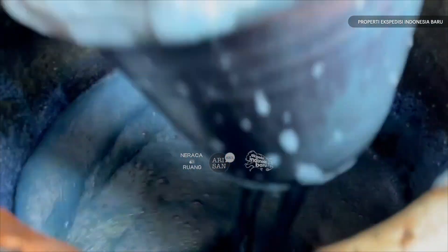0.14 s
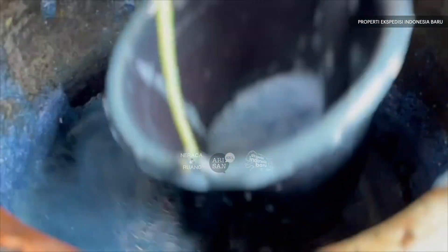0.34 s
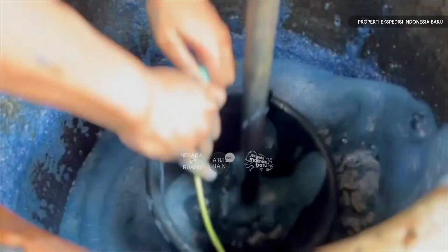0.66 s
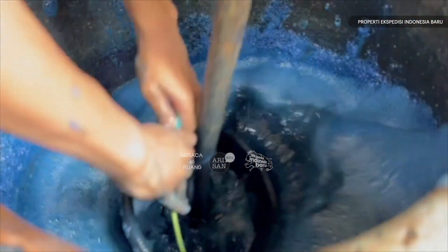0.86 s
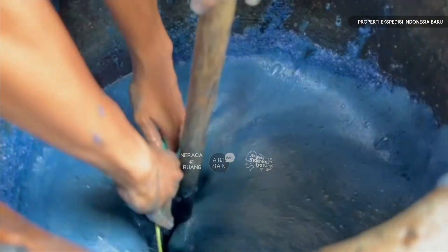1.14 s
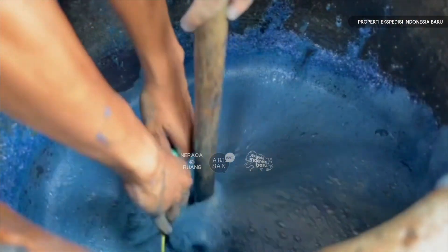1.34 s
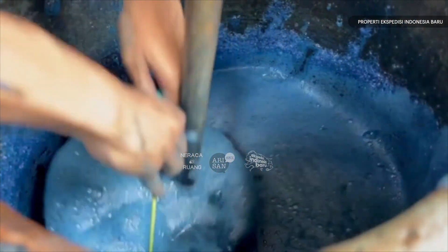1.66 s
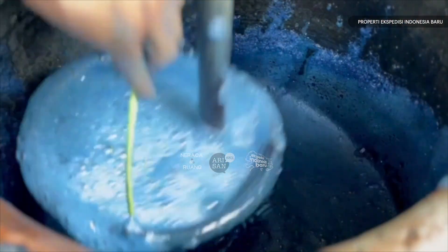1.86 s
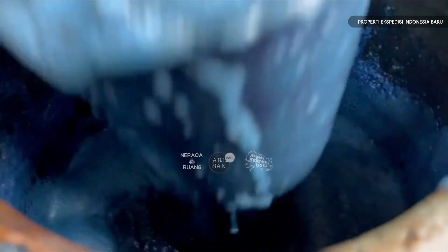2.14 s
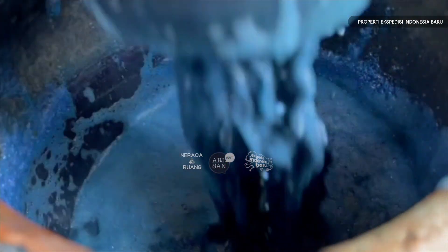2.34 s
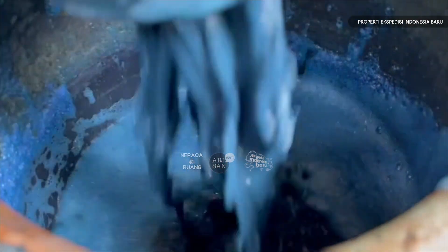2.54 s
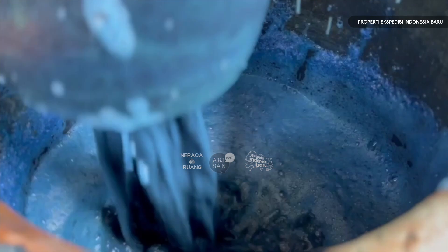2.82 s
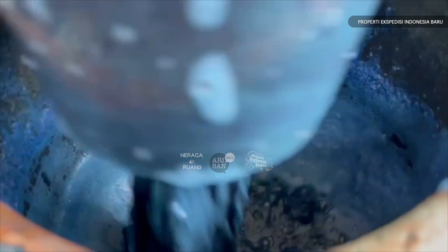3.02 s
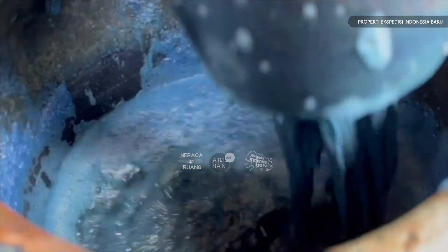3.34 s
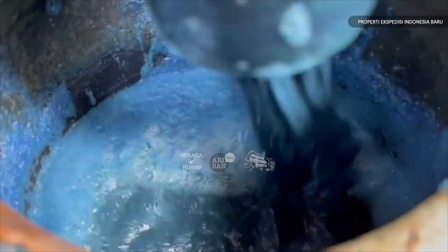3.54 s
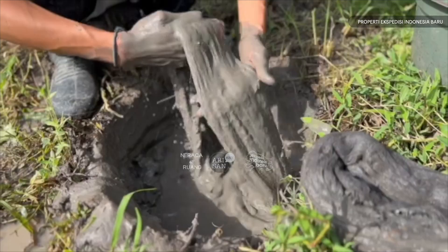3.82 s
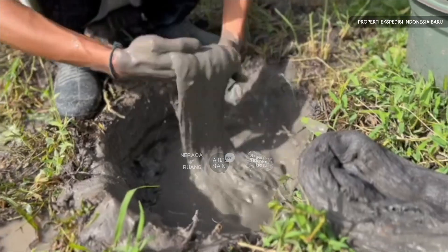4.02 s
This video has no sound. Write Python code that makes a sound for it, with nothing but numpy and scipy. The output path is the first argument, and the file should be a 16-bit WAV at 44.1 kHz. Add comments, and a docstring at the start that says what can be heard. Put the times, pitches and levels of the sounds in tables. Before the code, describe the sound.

Close inside a vat, dye drains and gurgles from a bucket, sinks with heavy booming sloshes, then pours noisily again until a sudden cut.

```python
"""Inside a deep vat of thick dye, the microphone just within the rim, a bucket full of holes goes up and down.
Dye streams from it as surging slosh (noise through low air modes), gurgle and froth (noise and bubbles
through cross modes) and spray (patchy noise and tiny bubbles). Knocks and booms are decaying tones,
splashes are noise puffs, and single bubbles are short rising tones. The round wall answers with a short
tail over steady outdoor air. The sound is cut off shortly before the end."""
import sys
import numpy as np
from scipy import signal
from scipy.fft import rfft, irfft, next_fast_len
from scipy.io import wavfile
from scipy.ndimage import uniform_filter1d, map_coordinates

SR = 44100
rng = np.random.default_rng(int(sys.argv[2]) if len(sys.argv) > 2 else 0)


def persist_wave(psi):
    """Save psi, clipped to +-1, as 16-bit WAV."""
    counts = np.round(np.clip(psi, -1, 1) * 32767).astype(np.int16)
    wavfile.write(sys.argv[1], SR, np.atleast_2d(counts).T)


N = 183985

# Dye streaming from the bucket and moving in the vat between blows.
# Each row: time in seconds, then slosh, gurgle, froth and spray level, all in dB.
FLOW = [(0, -21, -24, -30.5, -34.5), (.07, -24, -34.5, -35, -36), (.13, -30, -39, -32.5, -40.5),
        (.2, -31.5, -41, -46.5, -46), (.3, -33.5, -56, -54, -48.5), (.39, -36, -47.5, -50, -50.5),
        (.47, -22, -33, -39.5, -39.5), (.56, -39, -53.5, -52.5, -50.5), (.63, -30, -50, -64, -52.5),
        (.76, -27, -48.5, -54, -46), (1.0, -44.5, -52, -49, -47.5), (1.1, -22, -41, -47, -46),
        (1.2, -18.5, -37, -38, -46.5), (1.29, -16.5, -40, -48, -56), (1.48, -39, -58, -63.5, -58),
        (1.68, -46, -57, -58.5, -52.5), (1.84, -34.5, -49, -55, -53), (1.86, -40.5, -51, -38, -48),
        (1.96, -33.5, -36, -47.5, -47.5), (2.11, -31, -46, -38.5, -37), (2.26, -29, -37.5, -38, -32),
        (2.51, -28.5, -38, -37.5, -34), (2.63, -23.5, -35, -35, -30), (2.77, -20, -27, -29.5, -26.5),
        (2.9, -19.5, -32, -28.5, -28), (3.0, -22, -37.5, -29.5, -30.5), (3.33, -25, -31, -32, -33),
        (3.53, -31, -35, -35, -32), (3.68, -22, -27.5, -28, -32.5), (3.81, -26.5, -34.5, -35.5, -31.5)]
# Lowest air modes of the vat, the sharp one first. Each row: centre in Hz, width in Hz, relative level in dB.
BOOM_MODES = [(120.8, 6.83, 5.5), (97.2, 55.7, -4.5), (186, 104.5, -10.5), (72, 53, -11.5)]
# The broad low modes against the sharp one. Each row: time in seconds, level change in dB.
BROAD_MODE_LEVEL = [(0, -1), (0.6, -1), (0.9, -3.5), (1.6, -4), (2.0, 0), (2.8, 0), (3.8, 1)]
# Cross modes of the vat. Each row: centre in Hz, width in Hz, relative level in dB.
CROSS_MODES = [(369, 86, -2), (517, 70, 1.5), (676, 78, -1.5), (1002, 264, -2.5), (1181, 360, -0.5),
               (1367, 305, -2.5), (1688, 300, -13), (1950, 140, -8.5), (2160, 81, -11)]
# Colour of spray, in the stream and in the splashes. Each row: frequency in Hz, relative level in dB.
SPRAY_COLOUR = [(700, 0.5), (1650, 2), (2130, 4), (2600, 2), (2950, 0), (3500, -3.5), (5200, -5),
                (5700, -5.5), (7500, -6), (10300, -10.5), (12200, -4.5), (15500, -13)]
FIZZ_DB = -7.5  # fizz over spray
STIR_RISE_S, STIR_T60_S = 0.003, 0.079  # a blow stirs the dye up for a moment
# Stirring in dB: slosh over a thump's boom, gurgle over its bucket ring, froth over a splash.
STIR_SLOSH_DB, STIR_GURGLE_DB, STIR_FROTH_DB = -11.5, -14.5, -20


def stream():
    """Moving dye: surges drive the boom, bubbles sound through the vat's modes, spray fizzes."""
    slosh_db, gurgle_db, froth_db, spray_db = curves(FLOW)
    surge = wobble(14)

    lumps = amp(2.7 * wobble(30.1) + 1.1 * surge) * rng.standard_normal((2, N))
    sharp_boom = filtered(lumps, modes(BOOM_MODES[:1]))
    broad_level = amp(curves(BROAD_MODE_LEVEL)[0])
    broad_boom = filtered(broad_level * lumps, modes(BOOM_MODES[1:]))
    slosh = unit(sharp_boom - broad_boom)

    churn = patchy(patchy_db=1.2)
    churn = churn + 0.9 * bubbles(count=9000, size=480, centre_hz=1150, spread=0.55, turns=3, uneven_db=2.3)
    churn_gain = amp(0.88 * surge + 0.25 * wobble(43))
    gurgle, froth = split(churn_gain * filtered(churn, modes(CROSS_MODES)), hz=836, steep=10.6)

    drops = patchy(patchy_db=2.5)
    drops = drops + 0.33 * bubbles(count=7000, size=120, centre_hz=6000, spread=0.65, turns=2.5, uneven_db=2.4)
    drops *= amp(0.8 * surge + 1.304 * wobble(45) + 0.21 * wobble(110))
    spray, fizz = split(filtered(drops, spray_colour), hz=11000, steep=18.0)

    slosh_blows = [(s, boom_db + STIR_SLOSH_DB) for s, boom_db, *_ in THUMPS]
    gurgle_blows = [(s, ring_db + STIR_GURGLE_DB) for s, *_, ring_db in THUMPS]
    froth_blows = [(s, db + STIR_FROTH_DB) for s, db, _ in SPLASHES]
    return (slosh * stirred(slosh_db, slosh_blows)
            + gurgle * stirred(gurgle_db, gurgle_blows)
            + froth * stirred(froth_db, froth_blows)
            + amp(spray_db) * (spray + amp(FIZZ_DB) * fizz))


# Bucket knocks and gulps. Each row: start in seconds, boom level in dB, boom pitch in Hz,
# knock level in dB, pitch the knock settles to in Hz, bucket ring level in dB.
THUMPS = [(0.066, -20, 116.6, -30.5, 169, -42), (0.133, -19, 107, -19.5, 231, -21),
          (0.237, -33, 116, -28.5, 247, -48), (0.254, -24, 103, -22.5, 279, -35),
          (0.323, -31, 85, -34, 161, -35.5), (0.442, -21, 119.4, -19, 153, -40),
          (0.655, -11.5, 119.3, -22, 161, -25.5), (0.708, -20, 119.4, -32, 164, -36),
          (1.02, -26, 121.7, -18, 183, -29), (1.102, -19.5, 112, -23, 168, -33),
          (1.143, -22, 131, -31, 160.5, -40), (1.198, -18, 139.7, -20.5, 174, -32),
          (1.241, -8, 127, -28.5, 159.5, -33), (1.313, -24.5, 150, -17, 190, -36),
          (1.339, -30, 116, -16.5, 115, -45), (1.36, -10, 109.2, -16, 185.7, -22.5),
          (1.434, -23.5, 126, -34, 164.3, -33.5), (1.565, -30, 86.4, -59, 242, -46),
          (1.629, -30.5, 131.5, -33.5, 200, -32), (1.737, -30.5, 152, -8.5, 165, -28.5),
          (1.749, -22, 95, -8, 94, -53), (2.183, -21.5, 110, -38, 191, -52),
          (2.312, -17.5, 116.3, -47, 170, -42), (2.337, -17.5, 111, -44, 167, -58),
          (2.567, -17, 121, -17, 203, -27), (2.667, -20, 92, -29, 161, -28),
          (2.749, -12.5, 97, -33.5, 189, -29), (2.812, -9, 103.4, -26.5, 163.3, -33),
          (2.955, -12, 118, -10, 117.5, -36.5), (3.159, -15.5, 90, -19.5, 153, -25),
          (3.334, -23, 119.5, -36, 184, -29), (3.664, -14, 130, -15, 161, -26)]
# Ringing of the bucket itself. Each row: nominal pitch in Hz, level in dB over the ring, 60 dB decay in seconds.
BUCKET_MODES = [(337, -1, 0.045), (475, -5, 0.017), (640, -16, 0.038), (954, -20.5, 0.013),
                (1358, -14, 0.032), (2103, -18.5, 0.016)]
BOOM_RISE_S, BOOM_T60_S, KNOCK_RISE_S, KNOCK_T60_S, BUCKET_RISE_S = 0.0043, 0.2, 0.003, 0.067, 0.00081
KNOCK_SAG, KNOCK_SAG_S = 0.52, 0.0038  # a knock starts this share sharp and sags to its pitch


def thumps():
    """Each knock rings the bucket briefly; the vat's boom swells just after."""
    out, t = np.zeros((2, N)), np.arange(SR // 3) / SR

    def ring(turns, db, t60, rise):
        """A decaying tone, its second part a quarter cycle late."""
        return amp(db) * swell(t, rise, t60) * np.sin(2 * np.pi * (turns - [[0], [1 / 4]]))

    sagging = t + KNOCK_SAG * KNOCK_SAG_S * (1 - np.exp(-t / KNOCK_SAG_S))
    for s, boom_db, boom_hz, knock_db, knock_hz, ring_db in THUMPS:
        add(out, s, ring(boom_hz * t, boom_db, BOOM_T60_S, BOOM_RISE_S))
        add(out, s, ring(knock_hz * sagging, knock_db, KNOCK_T60_S, KNOCK_RISE_S))
        for hz, db, t60 in BUCKET_MODES:
            struck_hz = hz * (1 + 0.041 * rng.normal())
            struck_db = ring_db + db + rng.normal(0, 1.7)
            add(out, s, ring(struck_hz * t, struck_db, t60, BUCKET_RISE_S))
    return out


# Slaps of dye on the surface and wall. Each row: start in seconds, level in dB before the spray colour,
# brightness in dB (gain of the part above the split).
SPLASHES = [(0.059, -32, 4), (0.112, -36.5, 7), (0.169, -52, -9), (0.342, -35, 0.5), (0.462, -35, -9.5),
            (0.499, -32.5, -15.5), (0.634, -33, -3.5), (0.652, -25.5, 2), (0.704, -27, 3), (0.719, -37, 0),
            (0.797, -35.5, 4.5), (0.87, -38, -6), (0.906, -37.5, -7), (1.007, -36, 8.5), (1.024, -31, 4.5),
            (1.044, -25.5, 6.5), (1.06, -32.5, 4.5), (1.221, -42, 0), (1.367, -42, -7), (1.38, -39, -6),
            (1.7613, -43, 9.5), (1.8144, -43, -5.5), (1.854, -48, -8), (2.1044, -49, -1.5),
            (2.157, -23.5, 3), (2.184, -24.5, -4.5), (2.4325, -25.5, 9), (2.4914, -26.5, 7),
            (2.5505, -24, 0.5), (2.581, -24.5, 10.5), (2.61, -19, 6.5), (2.6457, -19.5, 3.5),
            (2.677, -23, -5.5), (2.726, -32, 5.5), (2.7473, -21, 3), (2.771, -23, 9), (2.8741, -21.5, -8.5),
            (2.9832, -29.5, -8.5), (3.054, -34.5, 19.5), (3.103, -26.5, -9.5), (3.451, -32.5, 19.5),
            (3.5472, -38, -3), (3.6331, -23, 4), (3.748, -34, -4.5)]
SPLASH_RISE_S, SPLASH_T60_S, SPLASH_SPLIT_HZ = .0045, .052, 10500
SPLASH_CRACKLE_DB, CRACKLE_RATE = 2.2, 220  # a splash breaks up into droplets: depth, random knots a second


def splashes():
    """Short noise puffs coloured as spray; brighter ones carry more of the highest treble."""
    low, high, t = np.zeros((2, N)), np.zeros((2, N)), np.arange(SR // 4) / SR
    for s, db, bright_db in SPLASHES:
        puff = amp(db) * swell(t, SPLASH_RISE_S, SPLASH_T60_S) * rng.standard_normal((2, len(t)))
        add(low, s, puff)
        add(high, s, amp(bright_db) * puff)
    low_share = lambda hz: 1 / (1 + (hz / SPLASH_SPLIT_HZ) ** 8)
    crackle = unit(amp(SPLASH_CRACKLE_DB * wobble(CRACKLE_RATE)))
    body = filtered(crackle * low, lambda hz: spray_colour(hz) * low_share(hz))
    treble = filtered(crackle * high, lambda hz: spray_colour(hz) * (1 - low_share(hz)))
    return body + treble


# Single loud bubbles. Each row: start in seconds, peak level in dB, starting pitch in Hz.
PLOPS = [(0.003, -28, 525), (0.005, -32, 795), (0.013, -30.5, 1196), (0.045, -28, 1450), (0.057, -24, 713),
         (0.059, -27, 493), (0.078, -24, 1244), (0.103, -25.5, 1160), (0.12, -28, 1630), (0.211, -35, 490),
         (0.266, -30.5, 315), (0.256, -34.5, 1020), (0.322, -32, 327), (0.019, -42, 1300),
         (0.033, -18, 473), (0.067, -22.5, 1140), (0.133, -27, 930), (0.132, -23, 481), (0.137, -30.5, 335),
         (0.148, -25.5, 334), (0.17, -30, 1980), (0.326, -37, 1330), (0.343, -33, 2140),
         (0.352, -31.5, 1140), (0.439, -32, 514), (0.445, -37, 2750), (0.448, -24.5, 333),
         (0.458, -38, 2750), (0.462, -36, 1090), (0.46, -34.5, 670), (0.469, -28, 480), (0.47, -23.5, 326),
         (0.478, -35.5, 2000), (0.48, -34, 1090), (0.637, -36.5, 920), (0.657, -29.5, 1350),
         (0.663, -35.5, 3570), (0.657, -23.5, 2880), (0.661, -37, 432), (0.687, -29, 415),
         (0.714, -32.5, 766), (0.78, -32.5, 393), (0.8, -46, 2380), (0.873, -32.5, 368), (0.876, -41, 2140),
         (0.908, -38, 2670), (0.909, -33.5, 1360), (1.025, -35, 420), (1.027, -32.5, 1340),
         (1.032, -31, 2080), (1.04, -28.5, 760), (1.043, -30.5, 1950), (1.132, -28, 466),
         (1.146, -24.5, 454), (1.15, -32, 700), (1.164, -29.5, 1180), (1.17, -30.5, 438), (1.191, -21, 467),
         (1.21, -19, 533), (1.209, -26, 850), (1.265, -27, 614), (1.268, -26.5, 508), (1.305, -29.5, 550),
         (1.306, -35, 720), (1.361, -21.5, 346), (1.362, -25.5, 491), (1.379, -33, 1290),
         (1.38, -26.5, 339), (1.439, -30, 329), (1.567, -42, 610), (1.629, -36.5, 645), (1.63, -40.5, 1280),
         (1.732, -28.5, 472), (1.741, -31, 427), (1.736, -39, 750), (1.764, -40, 2640), (1.853, -27.5, 920),
         (1.894, -33, 490), (1.926, -29, 413), (1.947, -32, 2000), (2.045, -27, 505), (2.076, -28, 1940),
         (2.156, -31, 700), (2.158, -30, 1140), (2.187, -34.5, 480), (2.283, -27, 637), (2.283, -24, 1115),
         (2.315, -23.5, 1920), (2.331, -30.5, 2100), (2.368, -25.5, 645), (2.4, -26.5, 650),
         (2.434, -26.5, 420), (2.462, -29, 670), (2.494, -20, 1870), (2.526, -23, 1880), (2.57, -25.5, 416),
         (2.57, -27, 900), (2.612, -27.5, 1220), (2.613, -39, 3000), (2.614, -26, 5200),
         (2.614, -31.5, 1880), (2.666, -19.5, 1037), (2.67, -27, 1540), (2.68, -18, 1060),
         (2.691, -28.5, 2920), (2.728, -25.5, 620), (2.748, -23.5, 830), (2.749, -23.5, 2870),
         (2.752, -29, 6500), (2.768, -21.5, 513), (2.773, -21.5, 1391), (2.801, -20, 2120),
         (2.826, -19, 1055), (2.837, -22.5, 2130), (2.857, -17, 507), (2.87, -18, 529),
         (2.873, -17.5, 1383), (2.875, -20.5, 2240), (2.964, -31, 2620), (2.985, -25, 2800),
         (3.006, -17, 1000), (3.102, -18.5, 1025), (3.147, -21, 520), (3.152, -22, 685),
         (3.228, -20.5, 630), (3.234, -17.5, 1026), (3.236, -29.5, 2070), (3.262, -24.5, 910),
         (3.317, -23, 756), (3.3, -20.5, 900), (3.38, -25.5, 904), (3.467, -23.5, 980), (3.481, -22, 530),
         (3.52, -17.5, 528), (3.62, -23.5, 1080), (3.64, -19, 2120), (3.671, -29.5, 2850), (3.69, -24, 546),
         (3.78, -22.5, 1426), (3.784, -27.5, 770), (3.8, -25.5, 2080)]
PLOP_LIFE, PLOP_RISE, PLOP_CLIMB = 3.75, .8, 0.0011  # decay cycles at 500 Hz, rise cycles, phase climb per cycle
PLOP_LIFE_GROWS = 0.25  # small bubbles ring more cycles: life grows as pitch to this power


def plops():
    """Single bubbles ring a few cycles as their pitch climbs slightly."""
    out, t = np.zeros((2, N)), np.arange(SR // 8) / SR
    for s, db, hz in PLOPS:
        cycles = hz * t
        life = PLOP_LIFE * (hz / 500) ** PLOP_LIFE_GROWS
        shape = np.exp(-cycles / life) * (1 - np.exp(-cycles / PLOP_RISE))
        turns = cycles * (1 + PLOP_CLIMB * cycles) - [[0], [1 / 4]]
        add(out, s, amp(db) * shape / shape.max() * np.sin(2 * np.pi * turns))
    return out


WALL_DB, WALL_T60_S, WALL_LOW_HZ, WALL_HIGH_HZ = -9, .1, 400, 5000  # the vat wall's answer


def wall(x):
    """The round wall throws the sound back and forth: a dense short tail with fine fixed resonances."""
    t = np.arange(SR // 5) / SR
    tail = amp(-60 * t / WALL_T60_S) * rng.standard_normal(len(t))
    echo = signal.fftconvolve(x, tail[None] / np.linalg.norm(tail), axes=1)[:, :N]
    band = lambda hz: 1 / (1 + (WALL_LOW_HZ / (hz + 1)) ** 4) / (1 + (hz / WALL_HIGH_HZ) ** 2)
    return amp(WALL_DB) * filtered(echo, band)


# Open air above the rim. Each row: frequency in Hz, relative level in dB.
AIR_COLOUR = [(40, -1), (110, 0.5), (190, -13), (300, -18.5), (700, -33.5), (2000, -38.5), (5000, -43.5),
              (10000, -39.5), (12500, -40.5), (15500, -39.5)]


def air():
    """The steady outdoor background, noise coloured by the vat."""
    return amp(-38.0) * unit(filtered(patchy(patchy_db=-0.5), lambda hz: amp(along(AIR_COLOUR, hz))))


def amp(db):
    """dB to gain."""
    return 10 ** (np.asarray(db) / 20)


def unit(x):
    """Scaled to rms 1."""
    return x / np.sqrt(np.mean(x ** 2) + 1e-20)


def along(points, hz):
    """(Hz, value) points read on a log frequency axis."""
    f, v = np.transpose(points)
    return np.interp(np.log(hz + 1), np.log(f + 1), v)


def curves(rows):
    """One value per sample for each column after the time."""
    s, *cols = np.transpose(rows)
    return [np.interp(np.arange(N) / SR, s, c) for c in cols]


def wobble(rate):
    """A smooth random curve, rate knots a second."""
    knots = rng.standard_normal(int(N * rate / SR) + 4)
    return map_coordinates(knots, [np.arange(N) * rate / SR])


def filtered(x, response):
    """x times a complex response of frequency."""
    m = next_fast_len(N + SR // 2)
    return irfft(rfft(x, m) * response(np.fft.rfftfreq(m, 1 / SR)), m)[..., :N]


def modes(table):
    """Causal response of (Hz, width, dB) resonances, alternating in sign."""
    def response(f):
        return sum((-1) ** k * amp(db) * 1j * f * w / (c * c - f * f + 1j * f * w)
                   for k, (c, w, db) in enumerate(table))
    return response


def spray_colour(hz):
    """The gain of spray at each frequency."""
    return amp(along(SPRAY_COLOUR, hz))


def split(x, hz, steep):
    """The parts of x below and above hz, each of rms 1."""
    low = filtered(x, lambda f: 1 / (1 + (f / hz) ** steep))
    return unit(low), unit(x - low)


def patchy(patchy_db):
    """Two noises that share time-frequency patches of random gain."""
    z = signal.stft(rng.standard_normal((2, N)), nperseg=256)[2]
    field = rng.standard_normal(z.shape[1:])
    field = uniform_filter1d(uniform_filter1d(field, 5, 0), 5, 1)
    return unit(signal.istft(z * amp(patchy_db * unit(field)), nperseg=256)[1][:, :N])


def bubbles(count, size, centre_hz, spread, turns, uneven_db):
    """Damped sines whose pitch rises a little as they reach the surface; two unrelated sets."""
    draw, t = rng.random((count, 2)), np.arange(size) / SR
    hz = np.minimum(centre_hz * np.exp(spread * rng.standard_normal((count, 1))), SR / 3)
    cycles = hz * t
    wave = np.sin(2 * np.pi * cycles * (1 + 0.034 * cycles / turns))
    wave *= np.exp(-cycles / turns) * (1 - np.exp(-1.2 * cycles))
    wave *= amp(-uneven_db * np.log(draw[:, :1] + .01))  # a few are much louder
    # Odd bubbles go into the second set, stored 2 N samples further on.
    start = (draw[:, 1:] * N).astype(int) + 2 * N * (np.arange(count)[:, None] % 2)
    out = np.bincount((start + np.arange(size)).ravel(), wave.ravel(), 4 * N)
    return unit(out.reshape(2, -1)[:, :N])


def swell(t, rise, t60):
    """A soft rise into an exponential decay, peak 1."""
    shape = amp(-60 * t / t60) * (1 - np.exp(-t / rise)) ** 2
    return shape / shape.max()


def stirred(level_db, blows):
    """A layer's gain: its flow level plus, in power, a short swell after each (s, dB) blow."""
    power = amp(level_db)[None] ** 2
    shape = swell(np.arange(SR // 3) / SR, STIR_RISE_S, STIR_T60_S)
    for s, db in blows:
        add(power, s, (amp(db) * shape) ** 2)
    return np.sqrt(power)


def add(track, s, sound):
    """Mix a sound in at s seconds."""
    part = track[:, round(s * SR):][:, :sound.shape[-1]]
    part += sound[..., :part.shape[1]]


# Likeness of left and right: alike in the bass, loosely related in the middle, opposed near 10 kHz,
# alike again near 13 kHz. Each row: frequency in Hz, likeness (held within -1 to 1 when used).
ALIKE = [(40, 0.95), (75, .997), (190, 1), (330, .93), (800, .88), (1200, .74), (1900, 0.55), (3000, .2),
         (6500, 0.17), (8500, 0.26), (9300, -1.045), (9600, -1.5), (10400, -1.7), (10800, -1), (11900, 0.9),
         (12600, .96), (14800, .96), (15400, 0)]
# Balance of left and right. Each row: frequency in Hz, left minus right in dB.
LEAN = [(400, 0), (1000, 0), (2000, -3.5), (3000, 0.5), (4200, 5), (5200, 8), (6500, 0), (8000, -1.5),
        (8900, 0)]
# Phase between left and right. Each row: frequency in Hz, lead of the left in radians.
LEAD = [(45, 0), (180, 0), (330, -0.4), (1000, 0.83), (2400, 1.36), (3600, 2.5), (5000, 0.65), (6500, 0)]


def scene():
    """Every source comes as a shared part and a part that differs between left and right."""
    turn = lambda hz: np.arccos(np.clip(along(ALIKE, hz), -1, 1)) / 2
    near = stream() + thumps() + splashes() + plops()
    water = near + wall(near) + air()
    mid, side = filtered(water, lambda hz: np.array([np.cos(turn(hz)), np.sin(turn(hz))]))
    half = np.array([[.5], [-.5]])  # left takes half of each difference, right the other half
    left_right = lambda hz: amp(along(LEAN, hz) * half) * np.exp(1j * along(LEAD, hz) * half)
    return filtered(np.array([mid + side, mid - side]), left_right)


# The closing cut-off. Each row: time in seconds, level in dB.
CUT = [(3.817, 0.5), (3.826, -23.5), (3.835, -44.5), (3.848, -51.5), (3.856, -130)]
TOP_HZ = 15800  # band limit


def record(dry):
    """The microphone rolls off the deep bass; the sound is cut off; nothing is kept above the band limit."""
    rumble_cut = lambda hz: (1j * hz / 42 / (1 + 1j * hz / 42)) ** 4
    cut_off = filtered(dry, rumble_cut) * amp(curves(CUT)[0])
    return filtered(cut_off, lambda hz: hz < TOP_HZ)


dry = scene()
out = record(dry)
persist_wave(out)
```